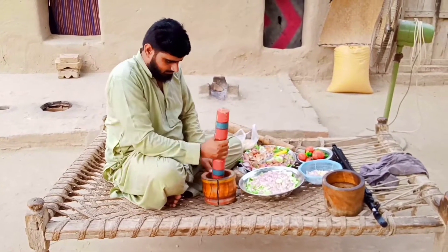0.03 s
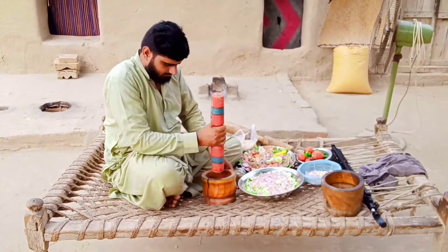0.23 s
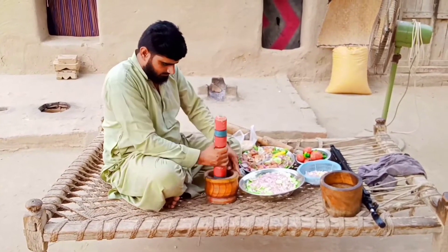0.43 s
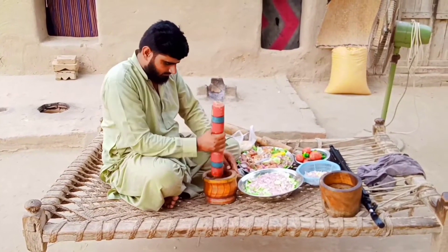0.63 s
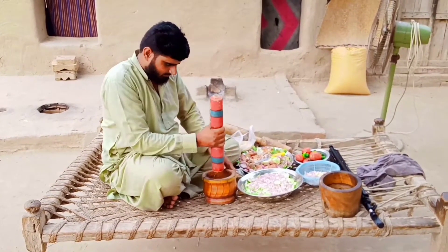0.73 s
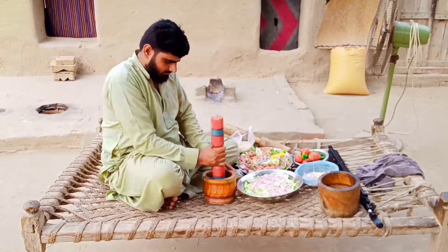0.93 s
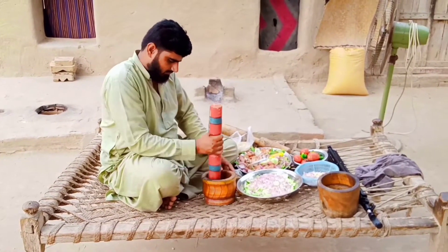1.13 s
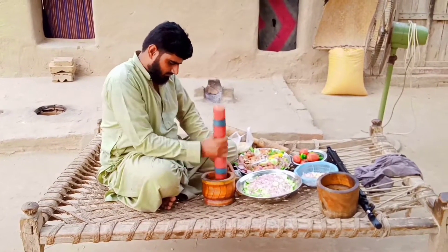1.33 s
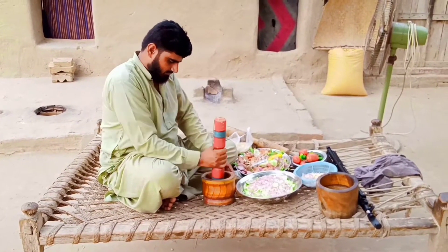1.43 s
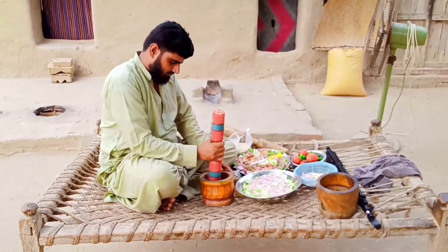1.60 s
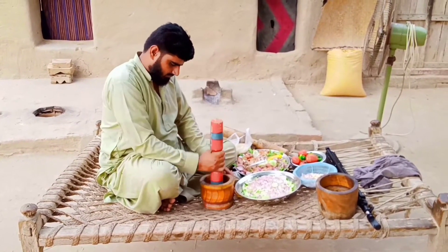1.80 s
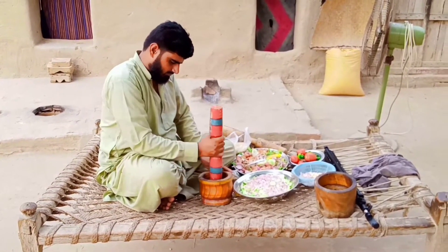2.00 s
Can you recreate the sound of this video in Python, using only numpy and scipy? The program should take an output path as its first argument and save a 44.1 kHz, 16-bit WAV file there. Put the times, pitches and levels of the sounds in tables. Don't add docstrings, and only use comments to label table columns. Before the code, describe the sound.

A wooden pestle strikes a wooden mortar four times at a steady pace, after the tail of an earlier knock; seeds crunch faintly between blows, courtyard walls echo, phone a few metres away, almost mono.

```python
import sys
import numpy as np
from scipy import signal
from scipy.fft import rfft, irfft, next_fast_len
from scipy.io import wavfile
from scipy.ndimage import uniform_filter1d, map_coordinates

SR = 44100
rng = np.random.default_rng(int(sys.argv[2]) if len(sys.argv) > 2 else 0)


def wrap_up_sound(samples):
    columns = np.atleast_2d(samples).T
    tamed = np.clip(columns, -1, 1)
    steps = np.round(tamed * 32767).astype(np.int16)
    wavfile.write(sys.argv[1], SR, steps)


def voltage_ratio(decibels):
    exponent = np.asarray(decibels, float) / 20
    return 10 ** exponent


N = 90581

# start in seconds, strength in dB.
BLOWS = [
    (-.0305, -6.5),
    (0.4684, -1),
    (0.9535, 0),
    (1.4566, -2.5),
    (1.8810, -0.5),
]


def unit(x):
    return x / np.sqrt(np.mean(x ** 2) + 1e-20)


def along(points, hz):
    f, v = np.transpose(points)
    return np.interp(np.log(hz + 1), np.log(f + 1), v)


def wobble(rate):
    knots = rng.standard_normal(int(N * rate / SR) + 4)
    return map_coordinates(knots, [np.arange(N) * rate / SR])


def filtered(x, response):
    m = next_fast_len(x.shape[-1] + 8192)
    spectrum = rfft(x, m) * response(np.fft.rfftfreq(m, 1 / SR))
    return irfft(spectrum, m)[..., :x.shape[-1]]


def add(track, sound, s):
    i = round(s * SR)
    part = sound[max(-i, 0):max(len(track) - i, 0)]
    track[max(i, 0):][:len(part)] += part


def ring(modes, attack_s, t):
    hz, t60, db = np.transpose(modes)[..., None]
    close = hz < 1.175 * np.roll(hz, 1)
    sign = -np.cumprod(np.where(close, -1, 1), axis=0)
    sign[1:] *= -1
    partials = sign * voltage_ratio(db - 60 * t / t60) * np.sin(2 * np.pi * hz * t)
    return partials.sum(axis=0) * (1 - np.exp(-t / attack_s))


def rush(spectrum, patchy_db):
    z = signal.stft(rng.standard_normal(N + 512), nperseg=512)[2]
    patches = uniform_filter1d(rng.standard_normal(z.shape), 6, 0)
    patches = unit(uniform_filter1d(patches, 12, 1))
    noise = signal.istft(z * voltage_ratio(patchy_db * patches), nperseg=512)[1][:N]
    low_hz = spectrum[0][0]
    return unit(filtered(noise, lambda hz: voltage_ratio(along(spectrum, hz)) * hz ** 2 / (hz ** 2 + low_hz ** 2)))


def rumble():
    # frequency in Hz, level in dB.
    rumble_curve = [(25, -34), (45, 1), (70, 1.5), (160, 3), (360, -1.5), (620, -8), (1100, -5),
                    (2500, -20)]
    return voltage_ratio(-50.5 + 1.3 * wobble(6.05)) * rush(rumble_curve, patchy_db=1.5)


def air():
    # frequency in Hz, level in dB.
    air_curve = [(1000, 4.5), (3600, 0.5), (4900, -11), (6900, 1.5), (8500, -7.5), (11000, -16.5),
                 (14000, -32), (15700, -38)]
    # frequency in Hz, side gain in dB.
    wide_curve = [(3300, -93), (4300, -6), (6500, -29.5), (9000, -13.5), (15000, 17.5)]
    level = voltage_ratio(-48.5 + 1.1 * wobble(2.75))
    centre = level * rush(air_curve, patchy_db=2.03)
    side_hiss = rush(air_curve, patchy_db=5.8)
    wide = level * filtered(side_hiss, lambda hz: voltage_ratio(along(wide_curve, hz)))
    return centre, wide


def motor():
    # frequency in Hz, level in dB rms.
    hum_lines = [(70, -61.5), (100, -53.5), (152, -55.5), (200, -67), (300, -68), (363, -67)]
    t, out = np.arange(N) / SR, np.zeros(N)
    for hz, db in hum_lines:
        level = np.sqrt(2) * voltage_ratio(db + 2.5 * wobble(13))
        out += level * np.sin(2 * np.pi * hz * t + 1.2 * wobble(11))
    return out


def rope_bed():
    # start in seconds, level in dB, pitch in Hz.
    nudges = [
        (1.4, -32.5, 450),
        (2.035, -37.5, 350),
        (1, -50, 160),
    ]
    t60_s, rise_s = 0.075, 0.012
    out, t = np.zeros(N), np.arange(SR // 8) / SR
    for s, db, hz in nudges:
        add(out, ring([(hz * 0.94, t60_s, db - 4.5), (hz, t60_s, db)], rise_s, t), s)
    return out


def squeak():
    start_s, length_s = 1.968, 0.035
    start_hz, sag_hz_per_s = 6750, 14000
    out, t = np.zeros(N), np.arange(round(length_s * SR)) / SR
    phase = 2 * np.pi * (start_hz * t - sag_hz_per_s * t ** 2 / 2) + 1.2 * wobble(340)[:len(t)]
    octave = voltage_ratio(-2 - 20 * t / length_s) * np.sin(2 * phase)
    swell = np.sin(np.pi * t / length_s)
    add(out, voltage_ratio(-45) * swell * (np.sin(phase) + octave), start_s)
    return out


def crunch():
    # start in seconds, length in seconds, level in dB, grain pitch in Hz.
    bursts = [
        (0.4, 0.017, -52, 3200),
        (0.511, 0.016, -44, 2600),
        (.99, .03, -39.5, 2200),
        (1.325, .035, -51, 2780),
        (1.495, .015, -45, 2200),
        (1.759, 0.042, -49, 4200),
        (1.821, .045, -48.5, 3580),
    ]
    out, t = np.zeros(N), np.arange(256) / SR
    for s, length, db, grain_hz in bursts:
        burst = np.zeros(SR // 8)
        for place, pitch, boost in zip(rng.random(80), rng.standard_normal(80), rng.exponential(size=80)):
            hz = np.clip(grain_hz * np.exp(0.573 * pitch), 600, 15000)
            grain = ring([(hz, 4.2 * 3 / hz, 0)], 0.0001, t)
            add(burst, voltage_ratio(2.5 * boost) * grain, place * length)
        add(out, voltage_ratio(db) * burst / np.linalg.norm(burst) * np.sqrt(length * SR), s)
    return out


def cracking_seed():
    # start in seconds, level in dB, tilt in dB per octave.
    snaps = [
        (2.0171, -27, -4),
        (2.0202, -20, -5.5),
        (2.0258, -36, 1),
    ]
    # frequency in Hz, t60 in seconds, level in dB.
    shell = [(3040, 0.0058, -0.5), (4000, 0.0026, 1.5), (6000, 0.0024, 1.5), (7000, 0.0048, 0.5),
             (8300, 0.0034, 0.5), (10900, 0.0022, -6), (13700, 0.0046, 0)]
    out, t = np.zeros(N), np.arange(900) / SR
    for s, db, tilt_db in snaps:
        modes = []
        for hz, t60, mode_db in shell:
            tilt = tilt_db * np.log2(hz / shell[0][0])
            modes.append((hz, t60, mode_db + db + tilt + rng.normal(0, 1.2)))
        add(out, ring(modes, 0.000071, t), s)
    return out


def yard():
    # frequency in Hz, t60 in seconds.
    yard_t60 = [(200, 0.75), (800, 0.55), (2000, 0.55), (6000, 0.31)]
    # delay in seconds, level in dB, dull above this many Hz.
    walls = [(0.0098, -19, 3000), (.0185, -20.5, 4000), (.031, -22.5, 2050), (.040, -28, 6000),
             (.053, -37, 2000), (.082, -28, 1200), (.117, -30.5, 1490)]
    far_wall = (0.0718, -17.5, 800)
    hz, t, z = signal.stft(rng.standard_normal(SR // 2), SR, nperseg=256)
    tail = signal.istft(z * voltage_ratio(-60 * t / along(yard_t60, hz)[:, None]), SR, nperseg=256)[1]
    response = np.pad(voltage_ratio(-14.5) * unit(tail) / np.sqrt(len(tail)), (400, 0))
    response[0] = 1
    for delay, db, dull_hz in [*walls, far_wall]:
        blur = np.exp(-2 * np.pi * dull_hz * np.arange(200) / SR)
        add(response, voltage_ratio(db) * blur / blur.sum(), delay)
    return response


def seed_burst(db, contact_s, t):
    t60_s, centre_hz = 0.023, 4000

    def band(hz):
        return hz * centre_hz / (hz ** 2 + centre_hz ** 2) / (1 + (hz / centre_hz) ** 2)

    noise = unit(filtered(rng.standard_normal(len(t)), band))
    return voltage_ratio(db - 60 * t / t60_s) * (1 - np.exp(-t / contact_s)) * noise


def pestle():
    # frequency in Hz, t60 in seconds,
    # then level in dB at each of four landing spots.
    wood = [(266, 0.015, -11.5, -10, -12, -16.5), (476, 0.017, -13, -8.5, -11, -14.5),
            (664.5, 0.035, -14, -8.5, -14.5, -24), (765, 0.022, 1, -5, -8.5, -5),
            (851, .024, -2, -4, -12, -2.5), (945, 0.049, -15, -15.5, -8, -18.5),
            (1113, 0.027, -15.5, -13, -13.5, -9.5), (1307, 0.026, -21, -28, -24, -37),
            (1555, 0.038, -16.5, -20.5, -14, -16), (1692, 0.05, -31.5, -27.5, -20, -16.5),
            (1835, 0.021, -22, -23.5, -8.5, -18), (2309, 0.023, -22, -20, -15.5, -16.5),
            (3020, 0.04, -36, -30, -39, -31), (4005, .025, -52.5, -48, -31, -36)]
    landing = [1, 0, 1, 2, 3]
    burst_db = [-26, -38, -30, -40.5, -49]
    contact_s = 0.00064
    out, t = np.zeros(N), np.arange(SR // 8) / SR
    for (s, db), spot, crack_db in zip(BLOWS, landing, burst_db):
        knock = ring([(m[0], m[1], m[2 + spot] + db) for m in wood], contact_s, t)
        crack = seed_burst(crack_db, contact_s, t)
        add(out, signal.fftconvolve(knock + crack, yard()), s)
    return signal.sosfilt(signal.butter(N=4, Wn=115, btype="high", fs=SR, output="sos"), out)


def gain_dips():
    t = np.arange(N) / SR
    return voltage_ratio(sum(-3 * np.exp(-np.abs(t - s) / 0.052) * (t > s) for s, _ in BLOWS))


def scene():
    duck = gain_dips()
    hiss, wide_hiss = air()
    background = motor() + rumble() + hiss
    mid = duck * background + rope_bed() + squeak() + crunch() + cracking_seed() + pestle()
    side = duck * wide_hiss
    return np.array([mid + side, mid - side])


def roll_off(x):
    return signal.sosfilt(signal.butter(12, 15770, fs=SR, output="sos"), x)


def record(dry):
    mix = filtered(dry, lambda hz: hz < 15600)
    return roll_off(mix)


dry = scene()
out = record(dry)
wrap_up_sound(out)
```